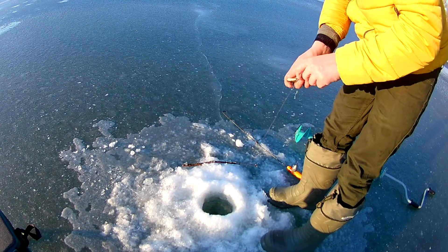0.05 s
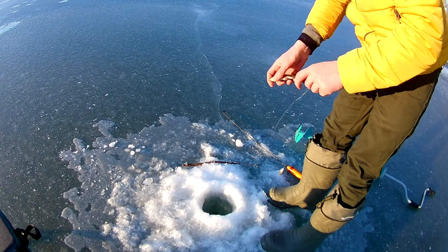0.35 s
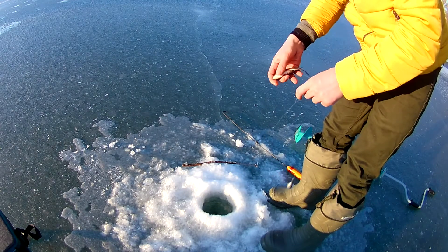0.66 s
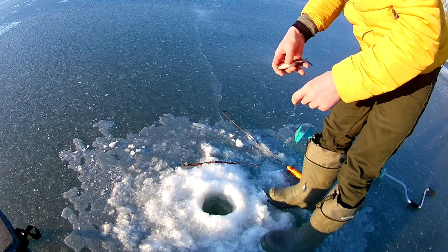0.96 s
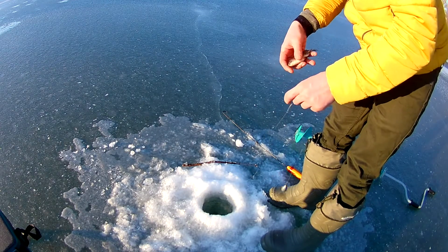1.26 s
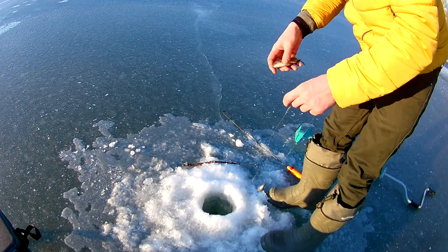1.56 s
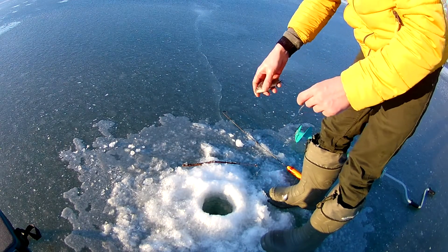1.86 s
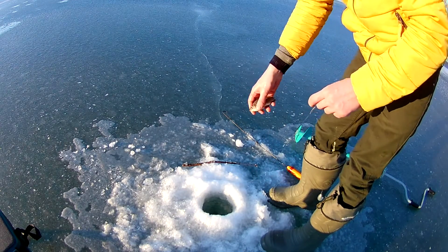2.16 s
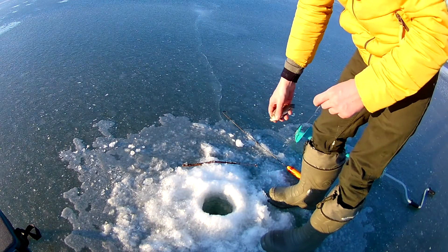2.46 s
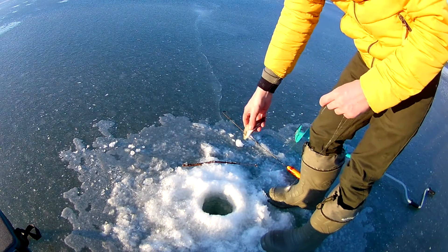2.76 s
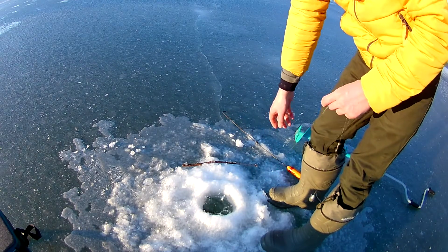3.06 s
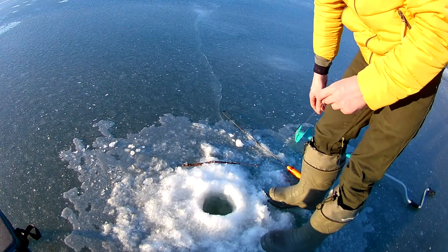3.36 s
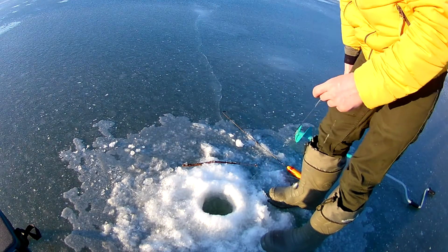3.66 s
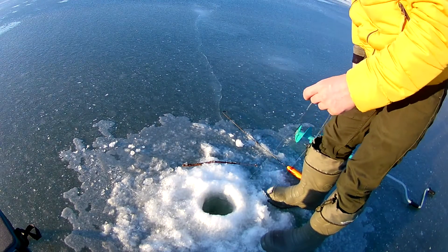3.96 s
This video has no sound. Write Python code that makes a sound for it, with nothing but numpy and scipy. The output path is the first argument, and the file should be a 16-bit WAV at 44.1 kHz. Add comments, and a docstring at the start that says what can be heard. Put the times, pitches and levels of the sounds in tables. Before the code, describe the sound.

One small, close plop and a trickle of droplets come from an ice fishing hole, after a few seconds of steady low wind outdoors. Boots and clothing tick faintly beforehand, then give a short dry rustle.

```python
"""On a frozen lake, wind rumbles low and steady under a thin hiss, and a faint far whine swells and fades.
A small object drops into a hole drilled in the ice: it slaps the water, bubbles ring and droplets
fall back in a fine spray. Boots and clothing give a few dry crackles beforehand, then a cluster as
the angler shifts. Now and then the treble drops out for an instant."""
import sys
import numpy as np
from scipy import signal
from scipy.fft import rfft, irfft
from scipy.io import wavfile

SR = 44100
rng = np.random.default_rng(int(sys.argv[2]) if len(sys.argv) > 2 else 0)


def put_to_file(sound):
    """Save the sound as 16-bit audio at rate SR, in the file named by the first command-line argument."""
    columns = np.atleast_2d(sound).T  # one column per channel
    safe = np.clip(columns, -1, 1)
    whole_steps = np.round(safe * 32767)
    wavfile.write(sys.argv[1], SR, whole_steps.astype(np.int16))


N = 176400
TIME, FREQS = np.arange(N) / SR, np.fft.rfftfreq(N, 1 / SR)


def amp(db):
    """Decibels to gain."""
    return 10 ** (np.asarray(db) / 20)


def unit(x):
    """Normalises to rms 1."""
    return x / np.sqrt(np.mean(x ** 2) + 1e-20)


def fader(points):
    """Gain ride through (time [s], level [dB]) points."""
    return amp(np.interp(TIME, *np.transpose(points)))


def add(mix, start_s, sound):
    """Mixes a sound in at its cue."""
    part = mix[round(start_s * SR):][:len(sound)]
    part += sound[:len(part)]


def decay(t, t60):
    """Envelope that falls 60 dB in t60 seconds, silent before time zero."""
    return (t >= 0) * np.exp(-np.log(1000) * np.maximum(t, 0) / t60)


def colour(x, curve):
    """EQ drawn on a log-frequency axis, scaled so that white noise keeps its power."""
    hz, db = np.transpose(curve)
    gain = amp(np.interp(np.log(FREQS + 1), np.log(hz + 1), db))
    return irfft(rfft(x) * unit(gain), N)


def wander(rate_hz):
    """Slow random modulation, rms 1."""
    slow_band = (FREQS > 0) * np.exp(-(FREQS / rate_hz) ** 2)
    return unit(irfft(rfft(rng.standard_normal(N)) * slow_band, N))


def grains(per_s, spread_db):
    """A texture of tiny random clicks of uneven size, rms 1."""
    clicks = (rng.random(N) < per_s / SR) * rng.choice([-1, 1], N)
    return unit(clicks * amp(spread_db * np.minimum(rng.exponential(1, N), 2)))


# EQ of the wind's rumble (frequency [Hz], relative level [dB])
RUMBLE_EQ = [(12, -39), (24, -9.5), (40, -8), (54, -6.5), (65, 2.5), (80, -4.5), (120, -7), (200, -11),
             (235, -10.5), (280, -13.5), (320, -17.5), (480, -23.5), (700, -25.5), (800, -34), (1100, -44),
             (1500, -68.5), (2400, -110)]
# fader ride of the rumble (time [s], level [dB])
RUMBLE_RIDE = [(0, -37), (2, -37.5), (4, -36.5)]
# EQ of the hiss (frequency [Hz], relative level [dB])
HISS_EQ = [(590, -10), (1000, -11.5), (1150, -3.5), (1770, -5.5), (2970, -10), (3490, -11.5), (3830, -12),
           (7880, -19.5), (15500, -20.5)]

def wind(hiss_db=-66.5):
    """The bed: a low, slightly wavering rumble of wind with a smooth hiss on top."""
    rumble = unit(colour(rng.standard_normal(N), RUMBLE_EQ))
    waver = amp(0.5 * wander(rate_hz=7))
    hiss = colour(rng.standard_normal(N), HISS_EQ)
    return fader(RUMBLE_RIDE) * waver * rumble + amp(hiss_db) * hiss


# swells of the whine (time [s], level [dB])
WHINE_RIDE = [(0.06, -80), (.17, -66), (.36, -66.5), (.48, -74.5), (.58, -72), (.66, -65.5), (.78, -77),
              (.9, -67), (1.12, -112)]

def far_whine(centre_hz=1325, half_width_hz=65):
    """A faint fuzzy tone from far across the ice: one narrow band of noise."""
    band = 1 / (1 + ((FREQS - centre_hz) / half_width_hz) ** 2)
    return fader(WHINE_RIDE) * unit(irfft(rfft(rng.standard_normal(N)) * band, N))


# rustle of the angler shifting (time [s], level [dB])
RUSTLE_RIDE = [(3.78, -90), (3.83, -68), (3.92, -60), (3.99, -60.5)]
# crackles of boots and clothing (time [s], level before EQ [dB], treble shelf [dB])
CRACKLE_CUES = [(2.014, -48.5, -8), (2.179, -49, -9), (2.466, -46.5, 5), (2.733, -48, -2),
                (3.526, -54.5, 2), (3.8201, -34.5, -0.5), (3.8401, -47, 3), (3.8802, -41, 5),
                (3.898, -54, 6), (3.913, -48, -1), (3.9225, -51, -7), (3.9302, -47, -2), (3.9384, -49, -5)]
# EQ shared by rustle and crackles (frequency [Hz], relative level [dB])
ANGLER_EQ = [(250, -13), (600, 0.5), (1000, 7.5), (1600, -0.5), (2200, -3), (2800, -13.5), (3700, -10),
             (5500, -20), (6800, -46.5), (16000, -51)]

def angler(click_db=13, tail_db=-21, shelf_hz=2820):
    """Boots and clothing: a grainy rustle and dry crackles, each a click with a short crunch."""
    out = fader(RUSTLE_RIDE) * grains(per_s=740, spread_db=-2)
    t = TIME[:SR // 10]
    crunch = decay(t, t60=0.0065) + amp(tail_db) * decay(t, t60=0.084)
    for start_s, db, treble_db in CRACKLE_CUES:
        snap = crunch * rng.standard_normal(len(t)) + amp(click_db) * (t == 0)
        body = signal.lfilter(*signal.butter(1, shelf_hz, fs=SR), snap)
        add(out, start_s, amp(db) * (body + amp(treble_db) * (snap - body)))
    return colour(out, ANGLER_EQ)


# bursts of fine spray (time [s], level [dB], t60 [s])
SPRAY_CUES = [(3.0288, -38.5, 0.024), (3.0334, -46, 0.046), (3.048, -56, 0.049), (3.108, -55.5, 0.11),
              (3.183, -52, .04), (3.2234, -52, .025), (3.237, -50, .015), (3.2503, -54, 0.028),
              (3.3655, -62, 0.013), (3.3762, -54, 0.012)]
# water stirring in the hole (time [s], level [dB])
SLOSH_RIDE = [(3.02, -88), (3.04, -54), (3.085, -65), (3.14, -64.5), (3.2, -56.5), (3.3, -71), (3.4, -69.5),
              (3.6, -75)]
# EQ shared by spray and stirred water (frequency [Hz], relative level [dB])
SPLASH_EQ = [(300, -24), (800, 12.5), (1500, 11.5), (3500, 0), (5000, -4), (7000, -18), (9000, -27),
             (12500, -15), (14000, -24)]

def splash():
    """Noisy bursts of spray over the fine patter of stirred water."""
    bursts = sum(amp(db) * decay(TIME - start_s, t60) for start_s, db, t60 in SPRAY_CUES)
    patter = fader(SLOSH_RIDE) * grains(per_s=1300, spread_db=3.5)
    return colour(bursts * rng.standard_normal(N) + patter, SPLASH_EQ)


# bubbles and droplets (time [s], starting pitch [Hz], level [dB], t60 [s], glide [octaves/s])
BUBBLE_CUES = [(3.0316, 3470, -27.5, 0.0092, -3), (3.0345, 4750, -45, .014, 0),
               (3.046, 3830, -40, 0.016, -12), (3.0520, 2470, -38.5, 0.033, -2.5),
               (3.0720, 3760, -62, 0.054, 6), (3.0980, 3680, -54, 0.021, -7),
               (3.1170, 2210, -47.5, 0.034, 4), (3.1572, 3500, -43.5, 0.02, 28),
               (3.1700, 1640, -48, 0.03, 14), (3.1895, 2470, -56, 0.017, 8), (3.1925, 4700, -48, .012, 0),
               (3.2015, 2400, -44, 0.021, 7), (3.2135, 6700, -58, .014, -10), (3.2168, 5800, -51, 0.016, 5),
               (3.2236, 1900, -32, 0.0087, 20), (3.232, 1500, -37, 0.011, 0), (3.2378, 1315, -32, .06, -6),
               (3.2655, 848, -41, .06, 5), (3.2930, 1650, -50, .03, 8), (3.3495, 2150, -45, 0.03, 23),
               (3.3650, 3400, -56, .04, 4), (3.3660, 4600, -50, .009, 40), (3.385, 3300, -52, 0.016, 0),
               (3.3990, 2500, -50.5, .045, -14.5), (3.4190, 1830, -56, .03, 0)]

def bubbles(attack_s=0.00076):
    """Each bubble or droplet rings as a dying sine that glides for half its t60, then holds its pitch."""
    out, t = np.zeros(N), TIME[:SR // 10]
    attack = 1 - np.exp(-t / attack_s)
    for start_s, hz, db, t60, glide in BUBBLE_CUES:
        pitch = hz * 2 ** (glide * np.minimum(t, t60 / 2))
        tone = np.sin(2 * np.pi * np.cumsum(pitch) / SR)
        add(out, start_s, amp(db) * attack * decay(t, t60) * tone)
    return out


# resonances of the water in the hole (frequency [Hz], relative level [dB], t60 [s])
HOLE_MODES = [(620, -6, 0.014), (723, 1.5, 0.016), (950, -11, 0.008), (1320, -8.5, 0.028),
              (2293, -13, 0.043), (3400, -18, 0.021)]
# the object hits the water, then its cavity closes (time [s], gain on the ring [dB])
SLAP_CUES = [(3.0288, -28.5), (3.0317, -35)]

def slap(low_cut_hz=350):
    """The main hit: the impact and the closing cavity each ring the water in the hole briefly."""
    out, t = np.zeros(N), TIME[:SR // 10]
    ring = sum(amp(db) * decay(t, t60) * np.sin(2 * np.pi * hz * t) for hz, db, t60 in HOLE_MODES)
    ring = signal.lfilter(*signal.butter(1, low_cut_hz, "high", fs=SR), ring)
    for start_s, db in SLAP_CUES:
        add(out, start_s, amp(db) * ring)
    return out


def hole_walls(x, wet_db=-16, t60=0.062, predelay_s=0.002):
    """Adds a tight reverb: scatter from the walls of the hole and the ice around it."""
    t = TIME[:SR // 8]
    tail = rng.standard_normal(len(t)) * decay(t - predelay_s, t60)
    return x + amp(wet_db) * signal.fftconvolve(x, tail / np.linalg.norm(tail))[:N]


def scene():
    """Mono mix: the background, the drop into the hole and the angler's movement."""
    background = wind() + far_whine()
    drop = hole_walls(slap() + bubbles()) + splash()
    return (background + drop + angler())[None]


# centres of the treble dropouts (time [s])
DROPOUT_CUES = [.146, .400, .636, 1.022, 1.403, 2.192, 2.386, 2.895, 3.004, 3.6, 3.772, 3.964]

def record(dry, gap_s=0.016, ramp_s=0.006, dip_db=-16, crossover_hz=3000, high_cut_hz=15800):
    """The treble ducks for an instant at each cue; a steep high cut trims the top of the mix."""
    gaps = sum(np.clip((gap_s / 2 - abs(TIME - s)) / ramp_s + 0.5, 0, 1) for s in DROPOUT_CUES)
    treble = dry - irfft(rfft(dry) / (1 + (FREQS / crossover_hz) ** 4), N)
    ducked = dry - (1 - amp(dip_db)) * gaps * treble
    high_cut = signal.firwin(511, high_cut_hz, window=("kaiser", 9), fs=SR)
    return signal.oaconvolve(ducked, high_cut[None], "same")


dry = scene()
out = record(dry)
put_to_file(out)
```